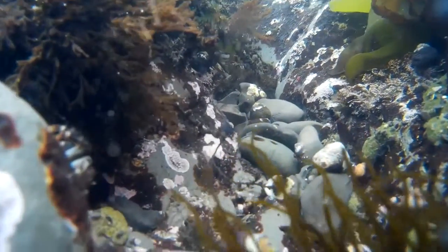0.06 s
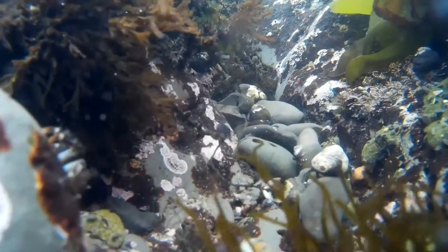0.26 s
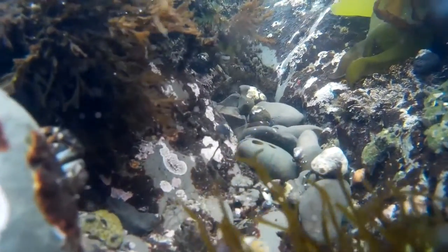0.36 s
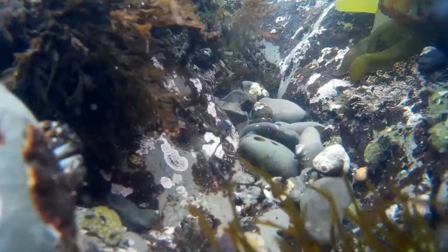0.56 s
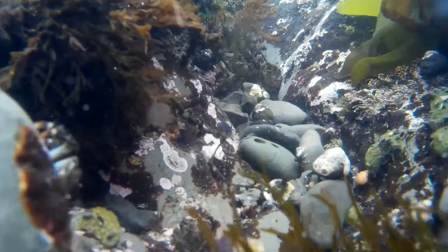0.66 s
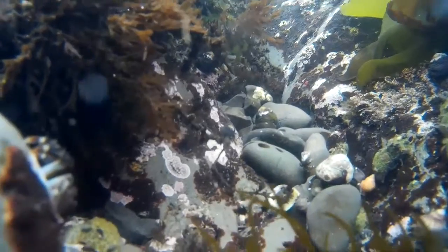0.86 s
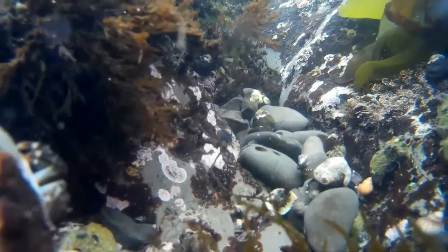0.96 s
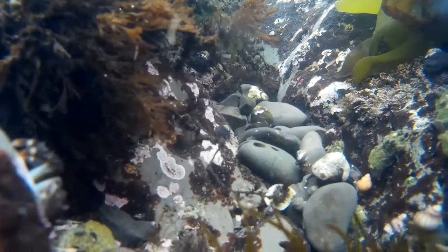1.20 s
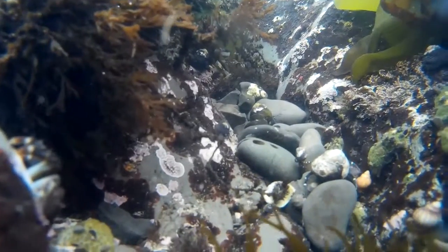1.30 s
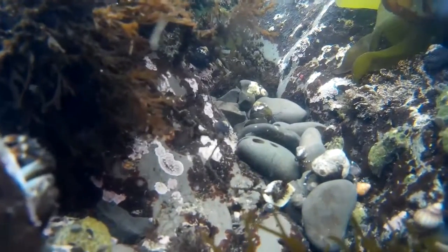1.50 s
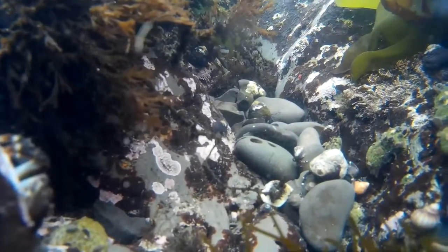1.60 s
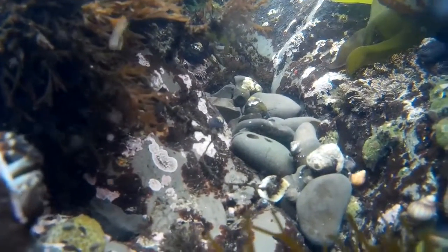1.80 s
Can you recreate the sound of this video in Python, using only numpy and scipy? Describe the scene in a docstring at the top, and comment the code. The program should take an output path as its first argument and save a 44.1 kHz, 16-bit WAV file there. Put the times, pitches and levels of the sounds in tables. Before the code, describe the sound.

A camera case bumps and scrapes against stone underwater, heard dry and close inside the housing. After near silence, dull thuds with short boxy ring and gritty clicks come around 0.25 s, 0.5 to 0.6 and 0.67 to 0.74. The strongest, with a tiny squeak, fall at 0.78 and 0.9 s. A quiet gap follows, then softer knocks at 1.44 and 1.57, fading into faint hiss, low water rumble and intermittent thin whine.

```python
"""Waterproof camera in a rock pool

Close up: a camera is shifted about against stone, heard by one microphone inside its housing.
Bumps give a low decaying thud, ring the water-damped case and shed gritty noise clicks.
Scrapes are grainy friction noise that also rings the case; a short steady tone makes one squeak.
Behind them lie a faint wavering whine, probably the lens motor, low water rumble and hiss."""
import sys
import numpy as np
from scipy import signal
from scipy.fft import rfft, irfft, next_fast_len
from scipy.io import wavfile
from scipy.ndimage import map_coordinates

SR = 44100
rng = np.random.default_rng(int(sys.argv[2]) if len(sys.argv) > 2 else 0)


def store_pcm(level_fs):
    """Save levels as 16-bit WAV."""
    pcm = np.round(np.clip(level_fs, -1, 1) * 32767).astype(np.int16)
    wavfile.write(sys.argv[1], SR, np.atleast_2d(pcm).T)


N = 81585  # samples, 1.85 s

# Swell of the water round the case: time_s, level_db
WATER_SWELL = [(0, -58.5), (.12, -63), (.42, -59), (.85, -54), (1.12, -63.5), (1.3, -60), (1.55, -58.5),
               (1.85, -64.5)]
# Spectrum of the moving water, relative power per Hz: frequency_hz, level_db
WATER_SPECTRUM = [(15, -8.5), (35, 1.5), (90, -6), (150, -3), (300, -11), (420, -10.5), (530, -5.5),
                  (600, -11), (680, -11), (800, -27), (1500, -33), (4000, -55)]
# Spectrum of the microphone hiss, relative power per Hz: frequency_hz, level_db
HISS_SPECTRUM = [(500, -13), (800, 3.5), (1300, -1), (2400, -3), (4000, -4), (8000, -5), (15500, -6)]
HISS_DB = -66.5

# Path of the lens motor tone: time_s, pitch_hz, level_db
MOTOR_PATH = [(0, 672, -63), (.07, 674, -73), (.15, 660, -89), (0.951, 635, -83), (1.03, 638, -62),
              (1.112, 660, -81), (1.15, 687, -66), (1.22, 672, -66), (1.30, 678, -63), (1.39, 667, -63),
              (1.47, 664, -79), (1.85, 660, -82)]
WHINE_WAVER_HZ, WHINE_FLUTTER_DB = 5.2, 1.5  # typical random deviation

# Resonances of the water-damped case: frequency_hz, relative_level_db, t60_s
CASE_MODES = [(393, -6, 0.045), (448, 0, 0.04), (526.7, -2, 0.051), (627.3, -3, 0.059),
              (664.4, -7.5, 0.052)]
CASE_RISE_S, MODE_SCATTER_DB = 0.0013, 3
CASE_LOW_HZ, CASE_HIGH_HZ = 358, 686  # the band in which the case gives way
# The place of contact favours some modes; the floor is the least gain left to the others
RING_FOCUS_OCTAVES, RING_FOCUS_FLOOR = 0.25, 0.26
CONTACT_SAMPLES = SR // 4  # length of each thud, click and ring

SQUEAK_START_S, SQUEAK_LENGTH_S, SQUEAK_EDGE_S = .7795, .022, 0.0024
SQUEAK_HZ, SQUEAK_DB = 445.6, -20.5

# Drags of stone over the housing; rise and fall are the times to lose 20 dB either side of the peak:
# peak_s, rise_s, fall_s, grit_db, grit_tilt_db_per_octave, case_db, ring_centre_hz
DRAGS = [(0.202, 0.014, 0.052, -67, 1, -51.5, 445), (0.251, 0.023, 0.026, -48, -3.5, -40.5, 580),
         (0.307, .03, 0.047, -55.5, -4, -41.5, 485), (0.455, .015, 0.015, -86, -2, -57, 434),
         (0.592, 0.062, 0.034, -55, 1, -45, 525), (0.674, 0.012, 0.023, -60, -8, -33.5, 560),
         (0.696, 0.031, 0.039, -57.5, 2.5, -39, 590), (0.792, 0.0096, 0.017, -42, -0.5, -26.5, 500),
         (0.908, 0.025, 0.016, -44.5, 1.5, -36, 500), (0.93, 0.02, 0.015, -39.5, 0, -32, 485),
         (1.437, 0.037, 0.029, -49.5, 1, -41, 483), (1.463, 0.008, .012, -54, 3, -47, 540),
         (1.477, 0.021, 0.024, -63.5, 0, -50.5, 544), (1.551, .014, 0.022, -60, 0.5, -45, 593),
         (1.574, 0.034, .02, -51.5, 0.5, -40.5, 470), (1.637, 0.012, 0.022, -68, 0, -53.5, 504)]
# Dragged grit heard through the case, relative power per Hz: frequency_hz, level_db
GRIT_SPECTRUM = [(300, -10), (780, -6), (1020, 5), (1310, 3), (1500, -0.5), (2000, 1.5), (2350, -11.5),
                 (2850, -8.5), (3150, 2), (3850, -3), (4200, -20), (5700, -14), (6800, -29.5), (15000, -31)]
ROUGH_DB, ROUGH_PER_S = 1, 240  # random unevenness of a drag and its rate
GRAINS_PER_S, GRAIN_SHARE = 1200, .65  # mean rate of slips and their share of the power
PRESS_CURVE = 1.56  # 1 is a pointed swell, 2 a rounded one

# Knocks of the camera on stone: start_s, thud_db, thud_pitch_hz, thud_t60_s,
# ring_db, ring_centre_hz, click_db, click_tilt_db_per_octave
KNOCKS = [(0.2365, -29.5, 118, 0.026, -27, 510, -34, -2), (0.2585, -28, 122, 0.065, -31, 513, -35, -10),
          (0.266, -49, 108, 0.052, -32, 570, -46, -16), (0.322, -35.5, 61.4, .09, -46, 420, -67, -5),
          (0.487, -29, 107.6, 0.058, -30, 490, -52, -4), (0.5855, -29.5, 129, 0.033, -50, 500, -52, 1),
          (0.599, -50, 130, .03, -39, 570, -58, 5), (0.6645, -26.5, 92, 0.028, -36, 600, -34.5, -6.5),
          (0.6678, -35, 196, 0.073, -26, 530, -25, 0.5), (0.696, -38, 120, .04, -31, 610, -52, -6),
          (0.72, -33, 39.7, 0.054, -60, 500, -62, 0), (0.7373, -31, 95, .035, -39, 430, -51.5, 6),
          (0.7794, -28, 60, 0.03, -42, 400, -31.5, -2), (0.795, -30.5, 73, 0.12, -20.5, 543, -27, 0.5),
          (0.805, -38, 74, .13, -36, 560, -68, -2), (0.904, -24, 96, 0.052, -29.5, 480, -57, 7),
          (0.919, -37, 149, .04, -25.5, 514, -37, -18), (0.93, -23, 118, 0.051, -28.5, 555, -30, 1),
          (0.9387, -32, 86, 0.13, -29, 500, -37, 1), (1.4355, -60, 120, 0.032, -26.5, 420, -45, 6),
          (1.4418, -27, 110, 0.065, -33, 567, -42, 5), (1.459, -40, 108, 0.08, -46, 556, -59, 11),
          (1.490, -46, 86.5, .1, -56, 500, -60, -3), (1.5655, -28.5, 114, 0.022, -28.5, 422, -54, -11),
          (1.5745, -39, 104, 0.075, -33.5, 650, -37, -11), (1.637, -42, 96, 0.051, -55, 473, -66, -3),
          (1.656, -46.5, 81, 0.18, -64, 500, -64, -3)]
# Loose grains of sand ticking on the case: start_s, level_db
SAND_TICKS = [(0.475, -48), (0.649, -55), (0.687, -40), (0.832, -72), (0.845, -71), (1.410, -56),
              (1.42, -46), (1.501, -50.5)]
# Single clicks heard through the case, relative power per Hz: frequency_hz, level_db
CLICK_SPECTRUM = [(200, -9), (310, -10), (780, -4.5), (1050, 3.5), (2000, 0.5), (2400, -11.5), (3100, 0.5),
                  (3850, -2), (4250, -27.5), (5700, -21.5), (7000, -32), (15000, -45)]
CLICK_RISE_S, CLICK_T60_S = 0.00076, .011
CLICK_TAIL_DB, CLICK_TAIL_T60_S = -31.5, .3  # tail level relative to the click
THUD_RISE_S = 0.00065
# The camera rocks on in the grip; level relative to the thud
SWAY_HZ, SWAY_T60_S, SWAY_DB = 85.8, 0.22, -22

TOP_HZ = 15690  # upper band limit of the camera


def amp(db):
    """Decibels to gain."""
    return 10 ** (np.asarray(db) / 20)


def unit(x):
    """Scale to rms 1."""
    return x / np.sqrt(np.mean(x ** 2) + 1e-20)


def clock():
    """Time of each sample in seconds."""
    return np.arange(N) / SR


def wobble(rate):
    """A smooth random curve, rate knots a second."""
    knots = rng.standard_normal(int(N * rate / SR) + 4)
    return map_coordinates(knots, [clock() * rate])


def filtered(x, response):
    """x times a response of frequency, padded against wrap-round."""
    m = next_fast_len(len(x) + SR // 10)
    spectrum = rfft(x, m) * response(np.fft.rfftfreq(m, 1 / SR))
    return irfft(spectrum, m)[:len(x)]


def coloured(x, points):
    """x shaped by (Hz, dB) points on a log frequency axis, at rms 1."""
    f, v = np.transpose(points)
    return unit(filtered(x, lambda hz: amp(np.interp(np.log(hz + 1), np.log(f + 1), v))))


def tilted(points, db_per_octave):
    """A spectrum made brighter or duller about 2 kHz; the tilt stops below 800 Hz and above 6 kHz."""
    return [(hz, db + db_per_octave * np.log2(np.clip(hz, 800, 6000) / 2000)) for hz, db in points]


def sine(t, hz):
    """A steady tone."""
    return np.sin(2 * np.pi * hz * t)


def fade(t, rise, t60):
    """A soft attack and an exponential decay."""
    return (1 - np.exp(-t / rise)) * np.exp(-np.log(1000) * t / t60)


def add(out, s, sound):
    """Mix a sound in at time s."""
    part = out[round(s * SR):][:len(sound)]
    part += sound[:len(part)]


def background():
    """Water moves softly round the case; the microphone hisses."""
    level_db = np.interp(clock(), *np.transpose(WATER_SWELL))
    water = amp(level_db) * coloured(rng.standard_normal(N), WATER_SPECTRUM)
    hiss = amp(HISS_DB) * coloured(rng.standard_normal(N), HISS_SPECTRUM)
    return water + hiss


def whine():
    """A faint wavering tone, probably the lens motor, that comes and goes."""
    s, hz, db = np.transpose(MOTOR_PATH)
    pitch_hz = np.interp(clock(), s, hz) + WHINE_WAVER_HZ * wobble(60.5)
    level_db = np.interp(clock(), s, db) + WHINE_FLUTTER_DB * wobble(40.1)
    tone = np.sin(2 * np.pi * np.cumsum(pitch_hz) / SR)
    return amp(level_db) * unit(tone)


def case_ring(t, centre_hz):
    """The case's decaying modes after one contact; those near centre_hz are favoured."""
    out = 0
    for hz, db, t60 in CASE_MODES:
        octaves_off = np.log2(hz / centre_hz)
        nearness = np.exp(-.5 * (octaves_off / RING_FOCUS_OCTAVES) ** 2)
        focus = RING_FOCUS_FLOOR + (1 - RING_FOCUS_FLOOR) * nearness
        gain = focus * amp(db + MODE_SCATTER_DB * rng.standard_normal())
        out = out + gain * sine(t, hz) * fade(t, CASE_RISE_S, t60)
    band = signal.butter(2, [CASE_LOW_HZ, CASE_HIGH_HZ], 'bandpass', fs=SR, output='sos')
    return signal.sosfilt(band, out)


def squeak():
    """Stick and slip lock briefly onto a case mode."""
    t = clock() - SQUEAK_START_S
    hold = np.clip(np.minimum(t, SQUEAK_LENGTH_S - t) / SQUEAK_EDGE_S, 0, 1)
    return -amp(SQUEAK_DB) * hold * sine(t, SQUEAK_HZ)


def friction():
    """Tiny slips of random size on a bed of rubbing noise."""
    slips = (rng.random(N) < GRAINS_PER_S / SR) * rng.standard_normal(N)
    rubbing = rng.standard_normal(N)
    return np.sqrt(GRAIN_SHARE) * unit(slips) + np.sqrt(1 - GRAIN_SHARE) * rubbing


def scrapes():
    """Stone drags over the housing: uneven grit that also keeps the case ringing."""
    out = np.zeros(N)
    for s, rise, fall, grit_db, tilt, case_db, centre_hz in DRAGS:
        t = clock() - s
        press = 10 ** -(np.maximum(-t / rise, t / fall) ** PRESS_CURVE)
        drag = friction() * amp(ROUGH_DB * wobble(ROUGH_PER_S))
        grit = coloured(drag, tilted(GRIT_SPECTRUM, tilt))
        struck_case = case_ring(clock()[:CONTACT_SAMPLES], centre_hz)
        ring = unit(signal.fftconvolve(drag, struck_case)[:N])
        out += press * (amp(grit_db) * grit + amp(case_db) * ring)
    return out


def click(t, tilt):
    """A grain cracks against the housing: a noise burst with a faint tail."""
    burst = fade(t, CLICK_RISE_S, CLICK_T60_S)
    tail = amp(CLICK_TAIL_DB) * fade(t, CLICK_RISE_S, CLICK_TAIL_T60_S)
    noise = coloured(rng.standard_normal(len(t)), tilted(CLICK_SPECTRUM, tilt))
    return (burst + tail) * noise


def bumps():
    """Each bump shoves the camera, rings its case and clicks; loose grains only click."""
    out, t = np.zeros(N), clock()[:CONTACT_SAMPLES]
    for s, thud_db, hz, t60, ring_db, centre_hz, click_db, tilt in KNOCKS:
        thud = sine(t, hz) * fade(t, THUD_RISE_S, t60)
        sway = amp(SWAY_DB) * sine(t, SWAY_HZ) * fade(t, THUD_RISE_S, SWAY_T60_S)
        shove = amp(thud_db) * (thud + sway)
        crack = amp(click_db) * click(t, tilt)
        ring = amp(ring_db) * case_ring(t, centre_hz)
        add(out, s, crack - shove - ring)
    for s, db in SAND_TICKS:
        add(out, s, amp(db) * click(t, 0))
    return out


def scene():
    """Everything reaches one microphone inside the case."""
    return (background() + whine() + squeak() + scrapes() + bumps())[None]


def record(dry):
    """The camera keeps nothing above its band limit."""
    return filtered(dry[0], lambda hz: hz < TOP_HZ)[None]


dry = scene()
out = record(dry)
store_pcm(out)
```